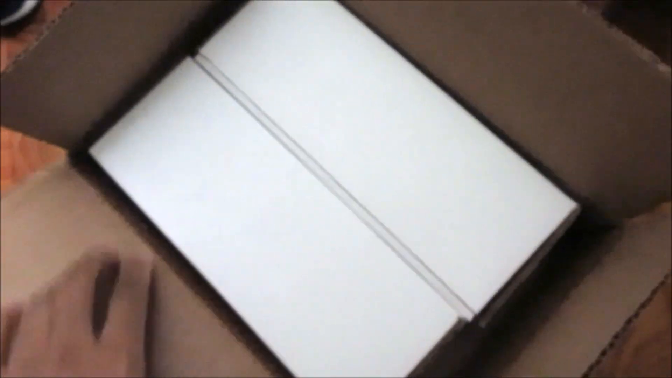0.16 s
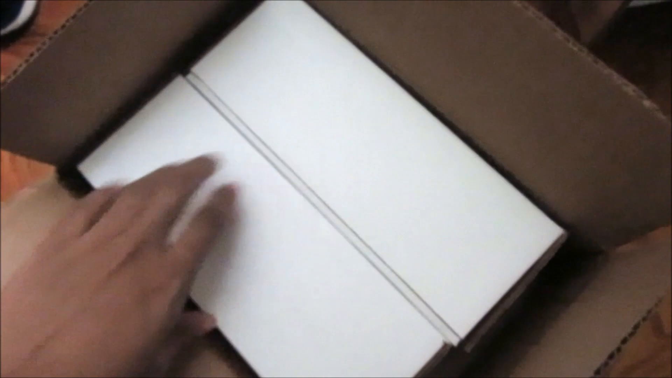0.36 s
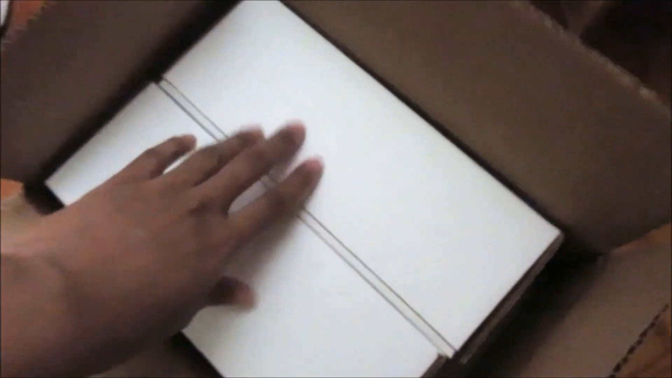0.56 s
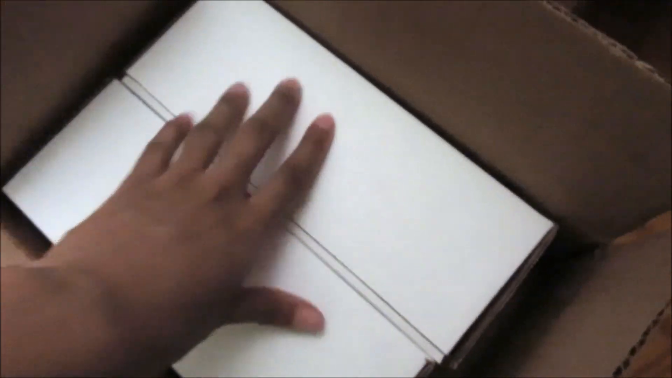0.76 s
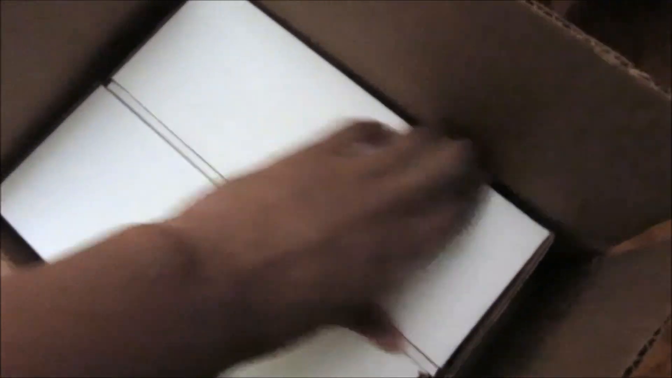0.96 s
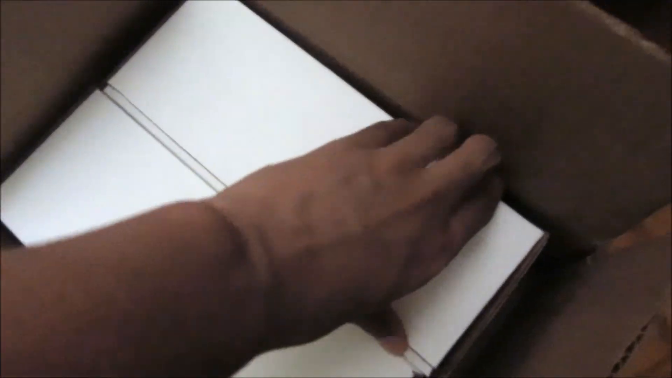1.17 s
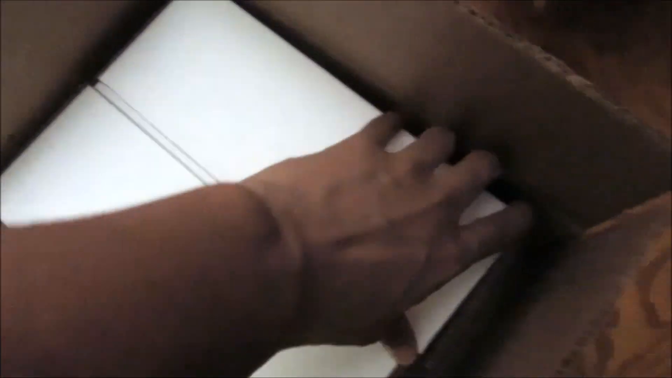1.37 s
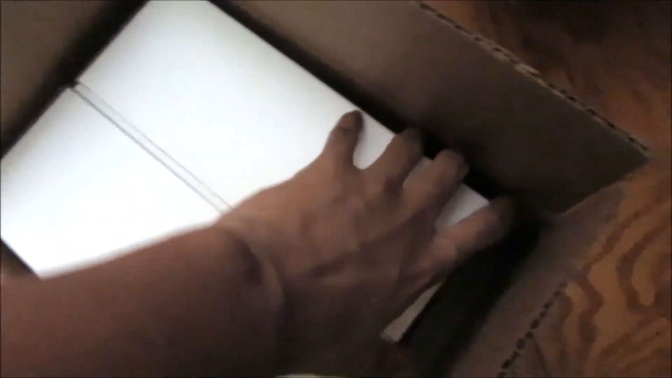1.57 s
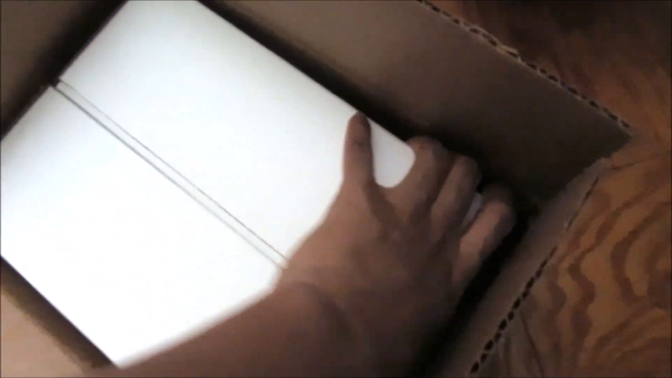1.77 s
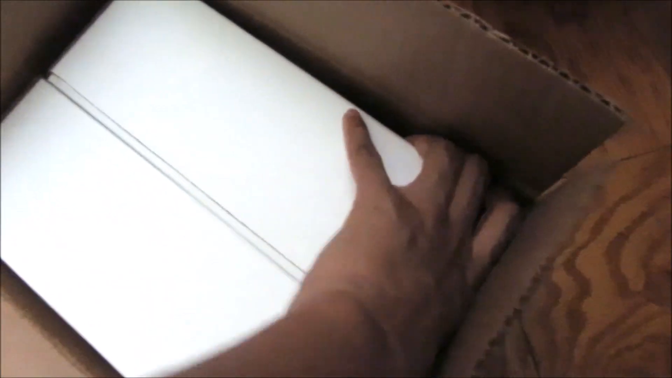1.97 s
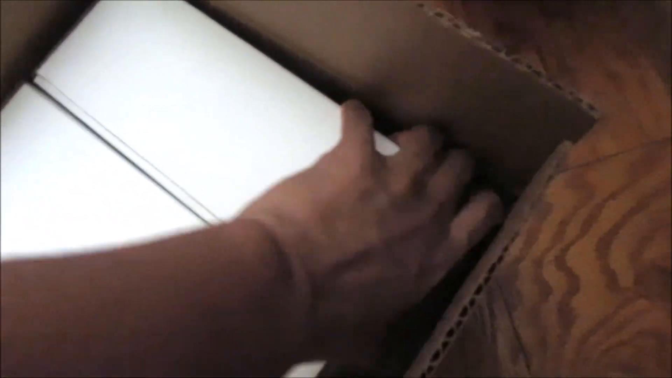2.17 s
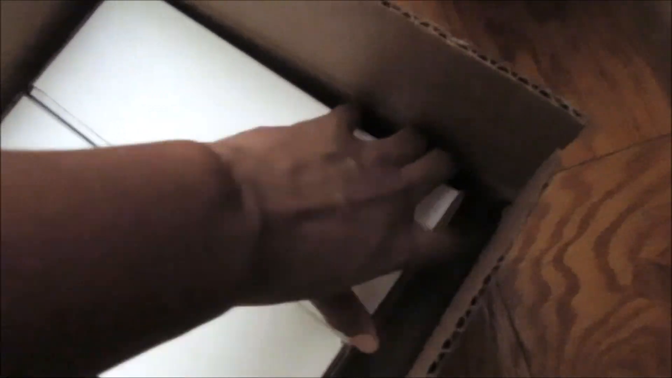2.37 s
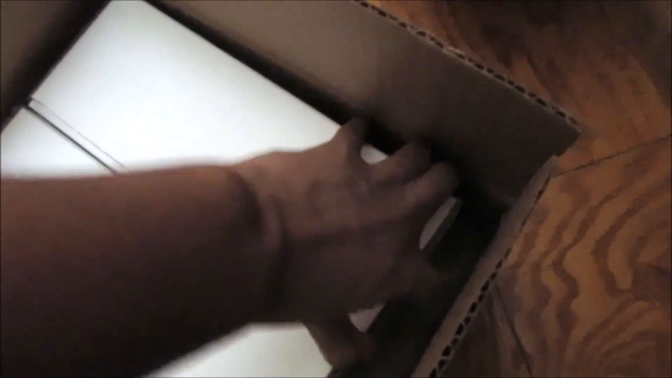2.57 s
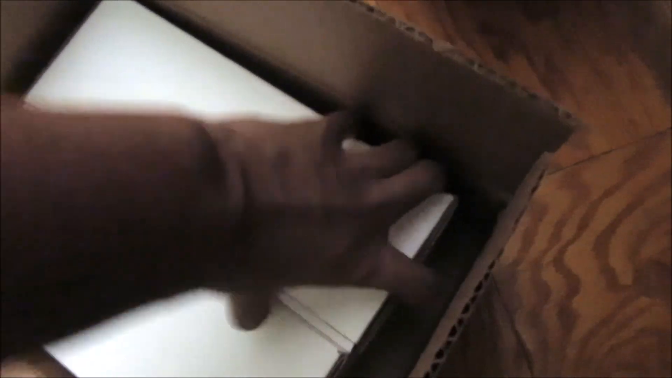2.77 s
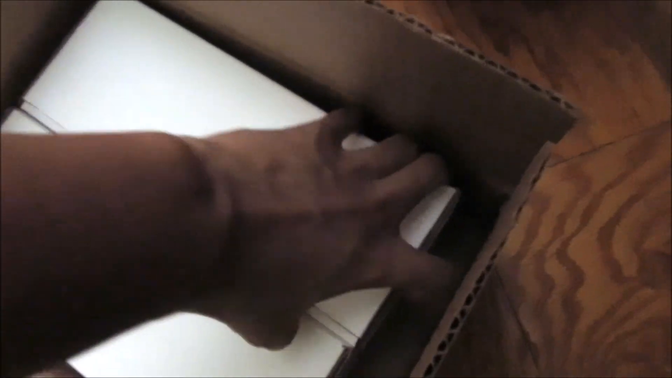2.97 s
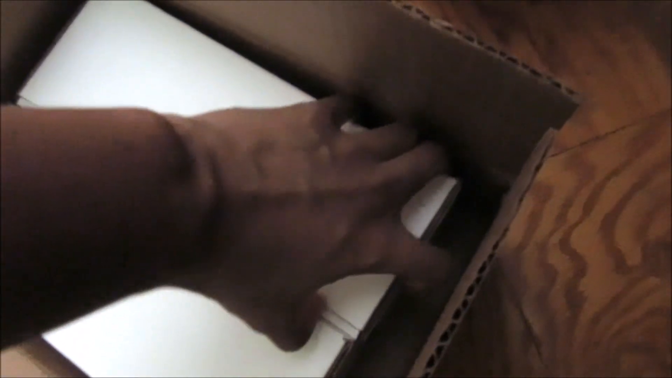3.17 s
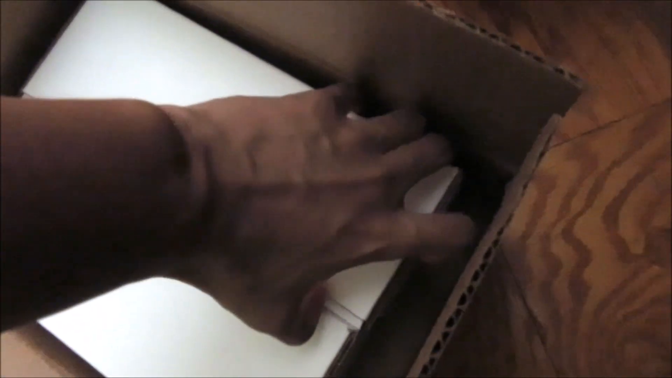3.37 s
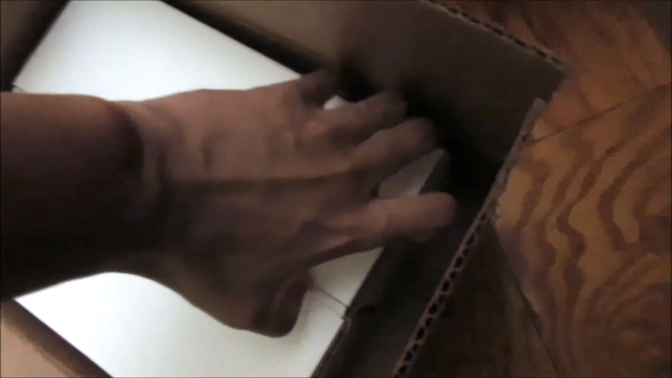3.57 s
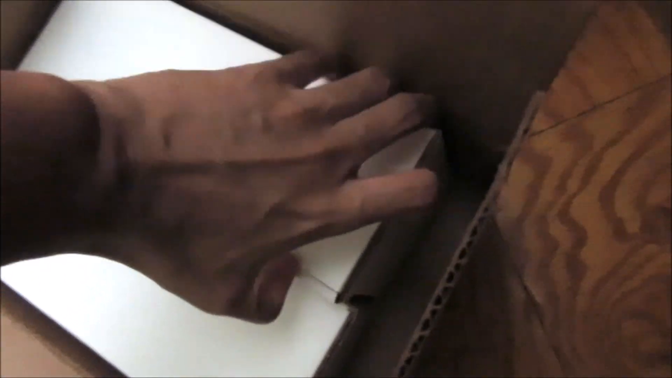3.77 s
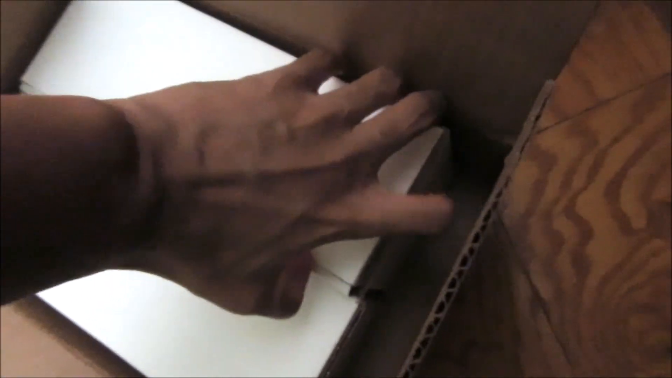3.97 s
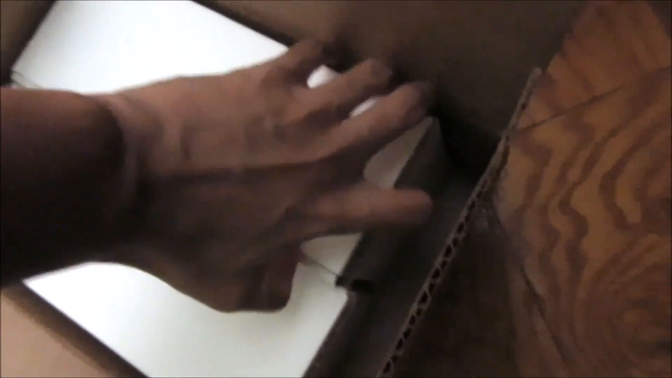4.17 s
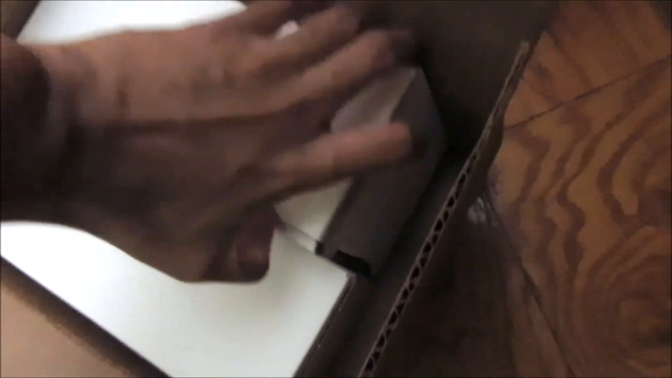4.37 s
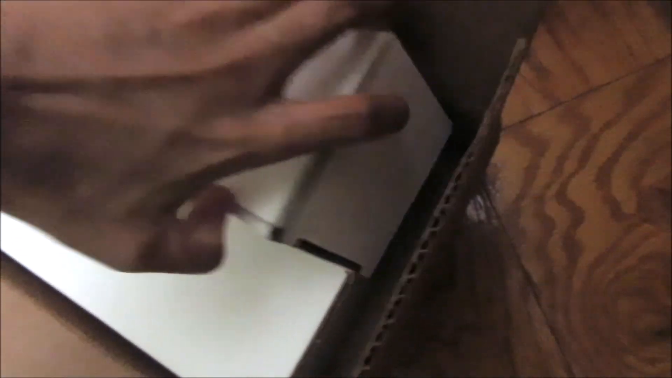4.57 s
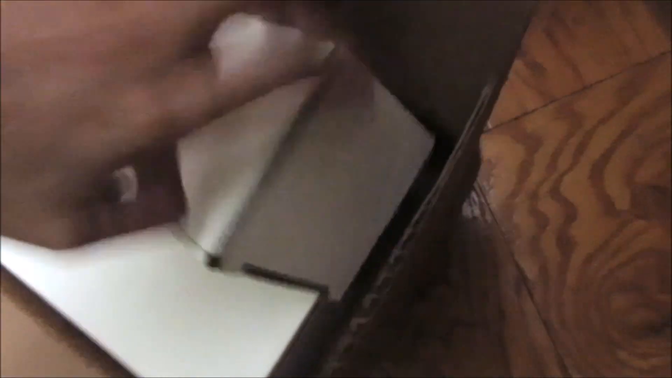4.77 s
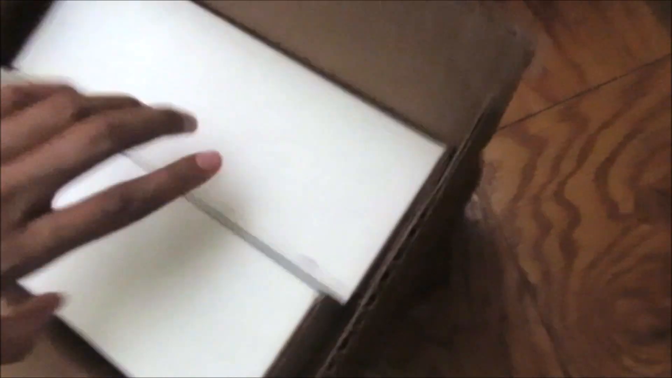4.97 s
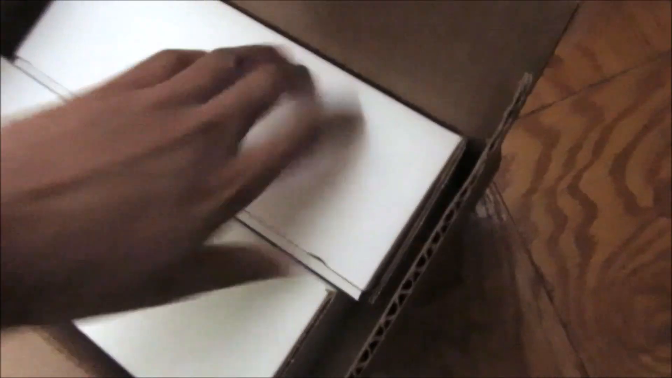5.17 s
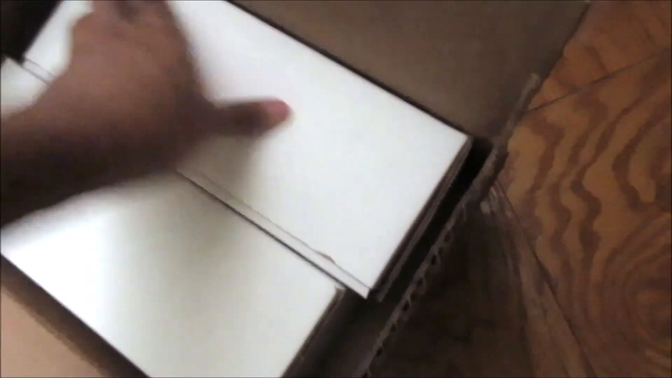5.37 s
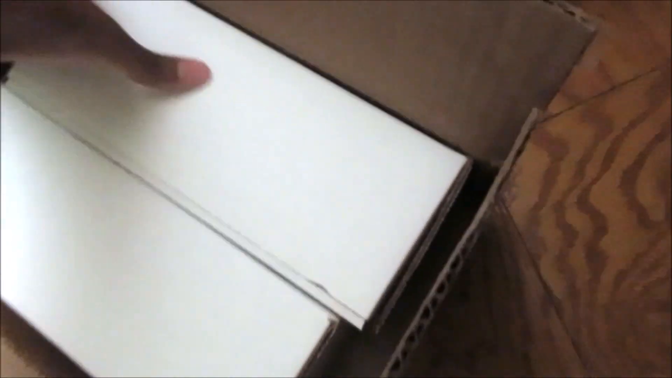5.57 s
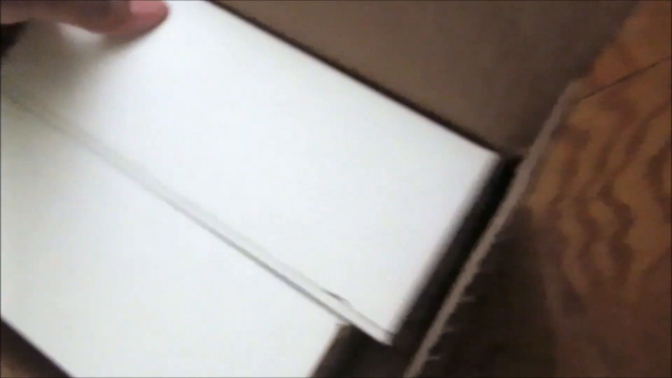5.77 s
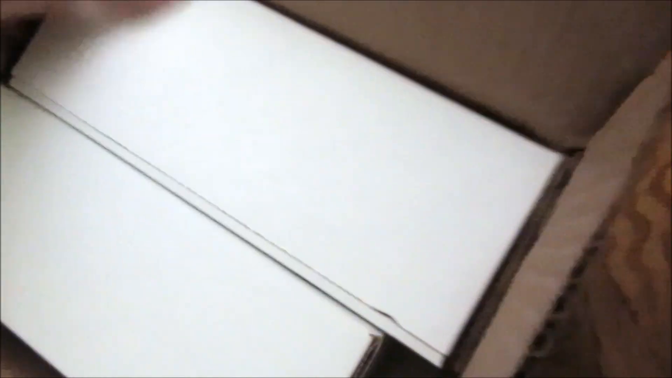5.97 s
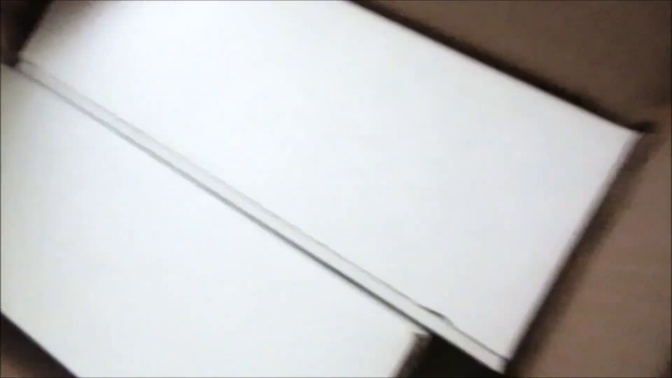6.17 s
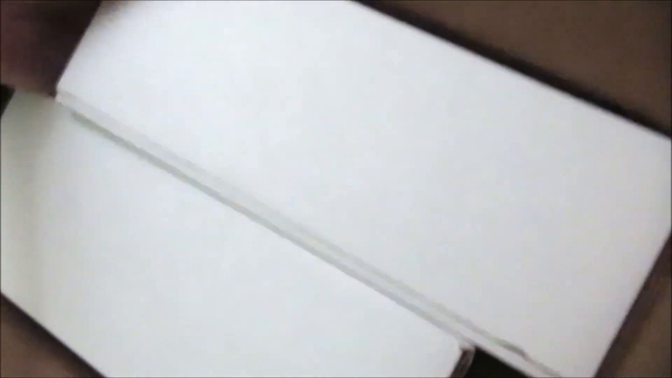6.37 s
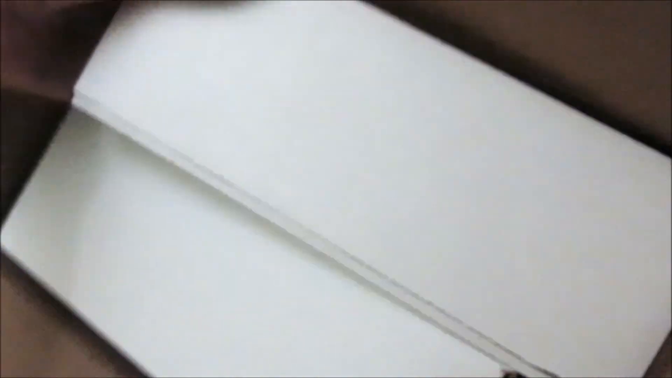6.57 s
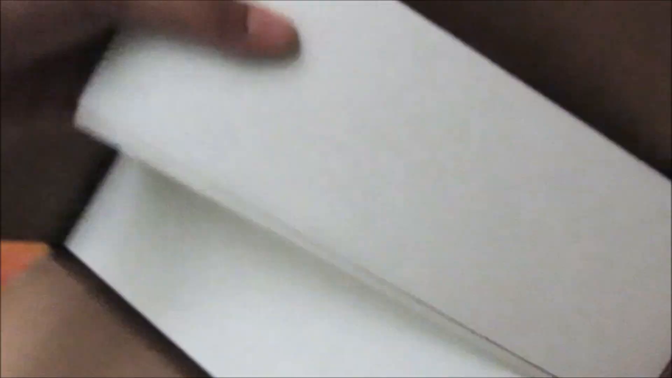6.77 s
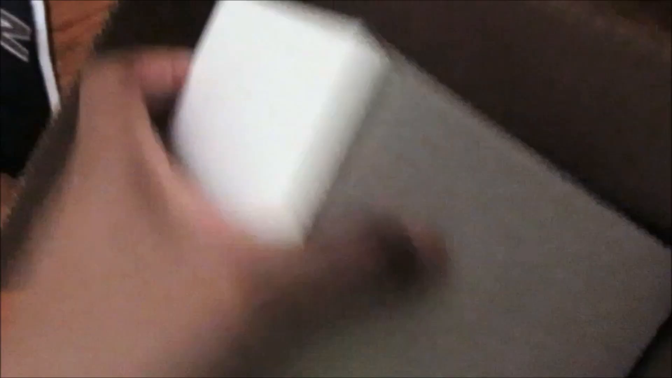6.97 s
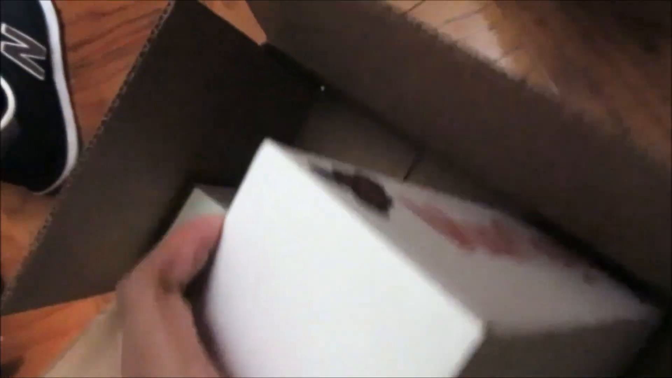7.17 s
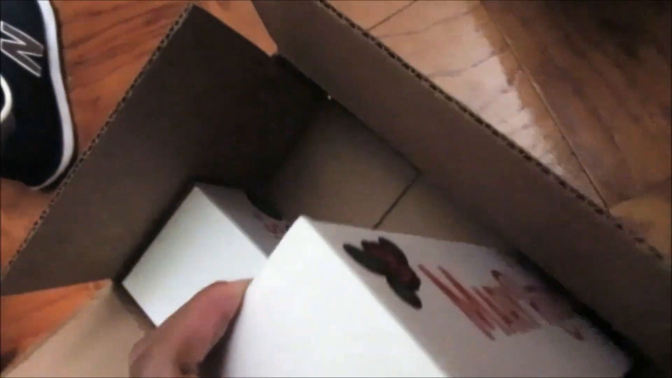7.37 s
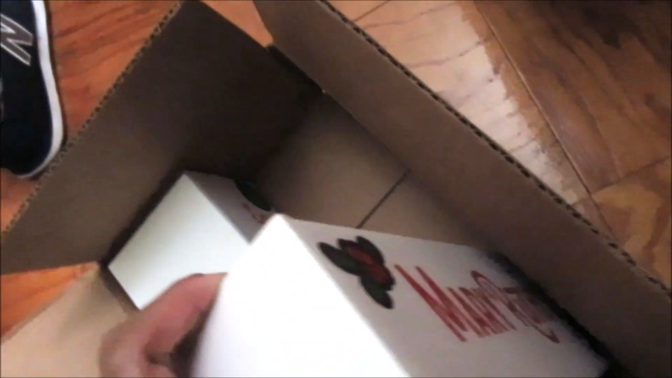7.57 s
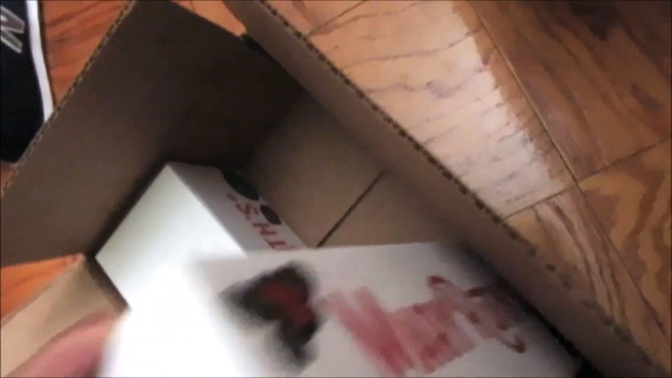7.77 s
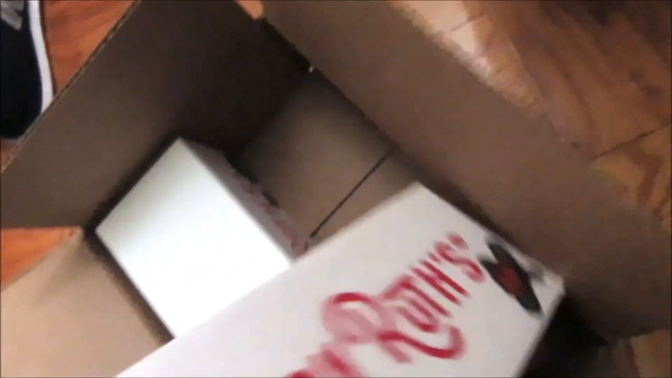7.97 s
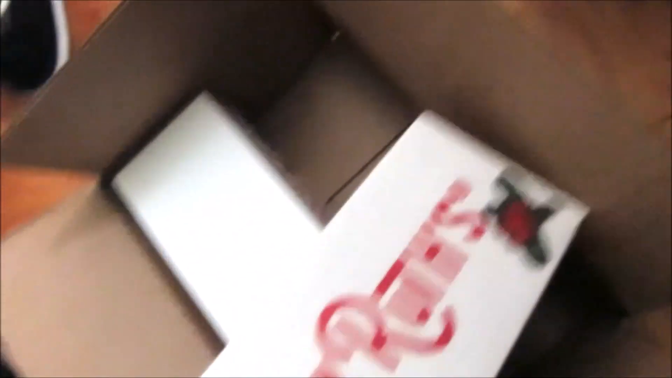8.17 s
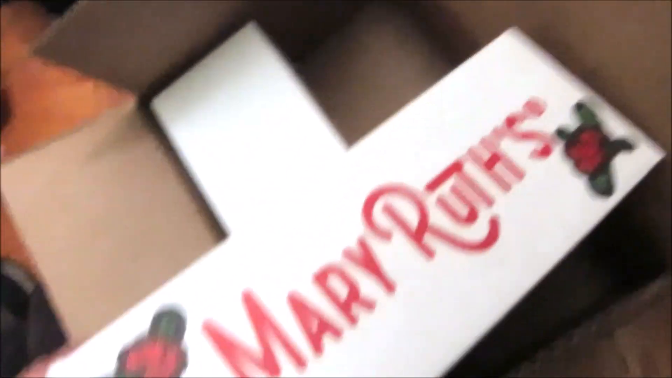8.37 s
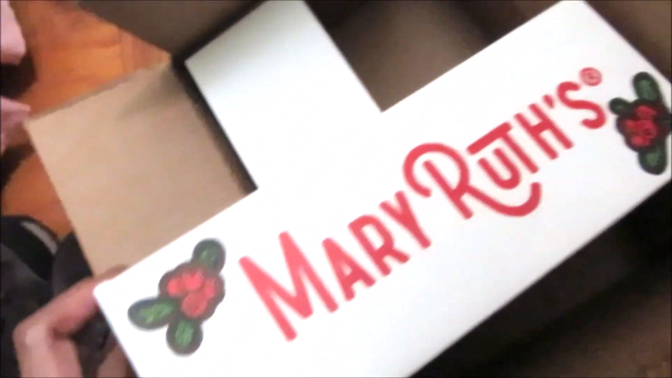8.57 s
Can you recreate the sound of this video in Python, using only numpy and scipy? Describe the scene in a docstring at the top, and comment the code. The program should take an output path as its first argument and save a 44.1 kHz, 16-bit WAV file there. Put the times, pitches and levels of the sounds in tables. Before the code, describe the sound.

Small cardboard boxes rub, knock and scrape as a hand pries one out of a carton, close up over a soft hum.

```python
"""A hand rubs, pries at, drops and pulls out small cardboard boxes packed in a carton.
Sliding card catches and lets go in many tiny slips, which hiss on the surface and make the hollow
boxes ring. Boxes knock together, their edges snap, and now and then a panel creaks.
Soft room noise and a mains hum lie underneath. It is all heard close up, in stereo."""
import sys
import numpy as np
from scipy import signal
from scipy.fft import rfft, irfft, next_fast_len
from scipy.io import wavfile
from scipy.ndimage import uniform_filter1d

SR = 44100
rng = np.random.default_rng(int(sys.argv[2]) if len(sys.argv) > 2 else 0)


def master(y):
    """Save y as 16-bit WAV."""
    cut = np.clip(np.atleast_2d(y).T, -1, 1)
    pcm = np.round(cut * 32767)  # scale
    wavfile.write(sys.argv[1], SR, pcm.astype(np.int16))


N = 379701

# the notes that carton and boxes ring with: (pitch [Hz], level [dB], time to fade by 60 dB [s])
CARD_NOTES = [(88.5, 1.5, 0.081), (141, -12.5, 0.2), (177, 0.5, 0.048), (256, 0.5, 0.07), (302, 4, 0.065),
              (343.6, 1, 0.049), (429.6, 2.5, 0.043), (499.3, 2.5, 0.069), (614, 3, 0.032), (706, 0, 0.067),
              (886, -1.5, 0.041), (1040, -5, 0.048), (1299, 9.5, 0.032), (1576, 11, 0.029),
              (1700, 12.5, 0.017), (1820, 8, 0.026), (2300, 4.5, 0.028), (2490, 7, 0.0076),
              (3870, 2, 0.014), (4400, 2, 0.011), (5100, 8, 0.0038)]
# the tone of card dragging on card: (frequency [Hz], relative level [dB])
DRAG_TONE = [(440, -16), (750, -2), (1130, 0.5), (2300, -3.5), (3190, -8), (3920, -12), (7000, -23.5),
             (9100, -31), (15400, -120)]
# the tone of fingertips on card: (frequency [Hz], relative level [dB])
HISS_TONE = [(3240, -8), (5500, -5.5), (7830, -6.5), (10100, -6), (13300, -7), (14900, -9.5), (15500, -22),
             (15900, -32)]
# how much the whole carton sways: (time [s], level compared with the box tone [dB])
CARTON_SWAY = [(0, -19), (0.75, -28), (1.4, -4), (2.6, -12), (4.1, -1.5), (4.27, -29), (4.78, -9),
               (5.1, -0.5), (5.3, -23), (5.57, 7.5), (6.0, -10), (6.6, -4), (6.79, -41), (7.12, -17),
               (7.9, -9), (8.22, -1), (8.61, -12)]


def rubbing():
    """Tiny slips shake the card surface, the hollow boxes and the whole carton."""
    t = np.arange(N) / SR
    steps = t[::128]
    drag_db, hiss_db, box_db = (np.interp(t, steps, db) for db in hand_moves(steps))
    sway_db = at_time(CARTON_SWAY, t)[0]
    fine = slips(per_s=6000, spread_db=1.6, rustle=1.3)
    coarse = slips(per_s=600, spread_db=2.5, rustle=1.5)
    drag = shape(fine, lambda hz: amp(at_hz(DRAG_TONE, hz)) * (1 + .1 * peaks(hz, CARD_NOTES[10:], .2)))
    hiss = shape(fine, lambda hz: amp(at_hz(HISS_TONE, hz)))
    hollow = shape(coarse, lambda hz: peaks(hz, CARD_NOTES[2:12], 2.93) * amp(-5 * above(hz, 330)))
    sway = shape(coarse[::-1], lambda hz: peaks(hz, CARD_NOTES[:2], 4) + .5 * bump(hz, 55, 20))
    jerk_db = drag_db - uniform_filter1d(drag_db, SR // 4)  # quick changes of drag shake the boxes too
    judder_db = 0.066 * np.maximum(drag_db + 67, 0) * wobble(150)  # hard drag catches and lets go
    surface = unit(drag) * amp(drag_db + judder_db) + unit(hiss) * amp(hiss_db)
    body = (unit(hollow) + unit(sway) * amp(sway_db)) * amp(box_db + 0.13 * jerk_db)
    # the tone flickers as the touching spots wander
    return flicker(surface + body, depth_db=2.2, bands=2, frames=14, lift=sliding)


# strokes over card: (full at [s], swell [s], hold [s], fade [s], drag [dB], hiss [dB], box tone [dB])
HAND_STROKES = [(0.005, 0.059, 0.0078, 0.3, -64, -63.5, -56), (0.202, .08, 0.012, 0.15, -69, -56.5, -56),
                (0.599, 0.008, 0.12, 0.44, -80, -59, -54.5), (1.022, 0.75, 0.051, 0.18, -57.5, -51, -52),
                (1.265, 0.11, 0.14, 0.21, -57, -54, -50.5), (1.561, 0.19, .003, 0.039, -56, -52.5, -47.5),
                (1.796, 0.45, 0.057, 0.19, -57.5, -58, -50), (1.977, 0.29, .003, 0.52, -57.5, -61, -51),
                (2.217, 0.28, .003, 0.2, -50.5, -57.5, -48.5), (2.328, 0.26, .003, 0.24, -59.5, -57, -44.5),
                (2.468, 0.2, .003, 0.28, -61.5, -60, -57), (2.703, 0.32, .003, 0.31, -56.5, -53.5, -46.5),
                (2.835, 0.16, 0.039, 0.14, -59.5, -59.5, -50.5), (3.025, 0.13, .003, 0.13, -57, -58, -48.5),
                (3.135, 0.073, 0.066, 0.088, -60.5, -63, -54), (3.315, 0.41, 0.018, 0.31, -64.5, -63, -55),
                (3.504, 0.19, 0.078, 0.65, -58.5, -64, -57.5), (3.846, 0.7, .003, 0.19, -58, -56.5, -49.5),
                (3.96, 0.25, .003, 0.24, -55.5, -60, -52.5), (4.047, .005, 0.0083, 0.26, -74, -58, -64),
                (4.263, 0.13, 0.12, 0.25, -57, -59.5, -51), (4.474, 0.35, 0.26, 0.51, -49, -57, -46.5),
                (4.826, 0.0077, .003, 0.17, -41, -47.5, -35), (4.9, 0.026, 0.042, 0.2, -42, -46, -47),
                (4.97, 0.012, 0.0025, 0.033, -24, -38, -29.5), (5.062, 0.13, 0.018, 0.09, -52, -86, -35.5),
                (5.298, 0.057, 0.064, 0.011, -59, -50, -44), (5.394, 0.05, 0.15, 0.11, -71, -53, -76),
                (5.56, 0.12, .003, 0.15, -42.5, -43, -50), (5.665, 0.17, 0.08, 0.28, -63.5, -53.5, -74),
                (5.841, 0.13, 0.057, 0.22, -50.5, -49, -56), (6.025, 0.94, 0.033, 1, -56.5, -55.5, -45.5),
                (6.363, 0.26, 0.044, 0.23, -48, -50, -44), (6.545, 0.13, 0.024, 0.15, -54, -48, -52),
                (7.267, 0.026, 0.089, 0.36, -50, -53, -50), (8.197, 0.11, .003, 0.27, -45, -47, -43),
                (8.284, 0.25, .003, 0.2, -45.5, -50, -51.5), (8.418, 0.13, 0.026, 0.44, -49.5, -56.5, -47)]
# a box is drawn out, then set down; one list per move: (time [s], drag [dB], hiss [dB], box tone [dB])
BOX_PULLS = [
    [(6.45, -56, -82, -42), (6.6, -46, -49.5, -44.5), (6.7, -40, -44.5, -35), (6.787, -38, -45.5, -33),
     (6.85, -32.5, -37, -32.5), (6.927, -38, -29.5, -43), (6.965, -32.5, -34, -39), (7.115, -50, -56, -49),
     (7.24, -52, -66, -50), (7.35, -81, -90, -74)],
    [(7.6, -81, -92, -68), (7.665, -66, -76, -60), (7.72, -53.5, -73, -54), (7.875, -45.5, -48, -51.5),
     (7.94, -42, -44.5, -43.5), (8.01, -49.5, -45, -46.5), (8.085, -54.5, -54, -45),
     (8.15, -51, -54.5, -51), (8.25, -85, -85, -61)],
]
# the hand at rest: (drag [dB], hiss [dB], box tone [dB])
RESTING_HAND = [-69, -84, -62]


def hand_moves(t):
    """Levels of drag, hiss and box tone in dB: strokes and pulls add to the resting hand."""
    swing_db = 28 * np.c_[[1, 1.55, 0.78]]  # how far each of the three rises in a swell, falls in a fade
    power = amp(RESTING_HAND)[:, None] ** 2 * np.ones(len(t))
    for full_at, swell, hold, fade, *level_db in HAND_STROKES:
        early = np.maximum((full_at - t) / swell, 0)
        late = np.maximum((t - full_at - hold) / fade, 0)
        power += amp(np.c_[level_db] - swing_db * (early + late)) ** 2
    for pull in BOX_PULLS:
        power += amp(at_time(pull, t)) ** 2 * (t > pull[0][0]) * (t < pull[-1][0])
    return 10 * np.log10(power)


def slips(per_s, spread_db, rustle):
    """Paper fibres stick and slip: uneven clicks over a smooth rustle, in two unrelated rows."""
    size = amp(spread_db * np.minimum(rng.exponential(1, (2, N)), 4))
    size *= rng.random((2, N)) < per_s / SR
    return unit(size * rng.standard_normal((2, N))) + rustle * rng.standard_normal((2, N))


# a slide sings, higher when faster: (start [s], end [s], first pitch [kHz], last pitch [kHz], boost [dB])
SINGING_SLIDES = [(0.56, 1.08, 23, 12, 10.5), (5.354, 5.516, 2.5, 3.5, 9.5), (5.364, 5.63, 19, 14, 6),
                  (5.933, 6.357, 3.1, 4.9, 7.5), (6.684, 7.026, 4.1, 6.7, 9.5)]
# card rings against card or palm: (start [s], end [s], boost [dB], pitch rise [fraction], pitches [Hz])
TOUCHING_FACES = [(4.4, 4.82, 8, 0.02, [520, 643, 1245, 1425, 1600]),
                  (4.41, 4.64, 10, 0.05, [3820, 4900, 5400]), (6.62, 6.95, 9, 0.04, [494, 627, 1020]),
                  (6.68, 6.86, 7.5, 0.08, [1870, 3060, 3370]),
                  (6.785, 6.953, 10.5, -0.00087, [2170, 2260, 2730]), (0.19, 0.26, 11, 0.01, [1630, 2650]),
                  (6.3, 6.426, 9, 0.028, [1150, 2820]), (7.08, 7.56, 8.5, -0.03, [1380]),
                  (7.26, 7.45, 10, -0.027, [2820, 3330, 3750]),
                  (0.71, 1.01, 8, 0.13, [2100, 3100, 3900, 5800])]


def sliding(hz, t):
    """Sliding faces make some pitches stand out; gives the boost in dB by frequency and time."""
    boost = np.zeros((len(hz), len(t)))
    hz = hz[:, None]
    for start, end, first, last, db in SINGING_SLIDES:
        progress = np.clip((t - start) / (end - start), 0, 1)
        centre_hz = 1000 * (first + (last - first) * progress)
        boost += db * np.sin(np.pi * progress) * np.exp(-(apart(hz + 1, centre_hz) / 0.69) ** 2)
    for start, end, db, rise, pitches in TOUCHING_FACES:
        on = (t > start) & (t < end)
        progress = (t[on] - start) / (end - start)
        touch = np.minimum(np.minimum(progress, 1 - progress) / 0.14, 1)
        bend = 1 + rise * (progress - .5)
        bands = sum(np.exp(-((hz - f * bend) / (2.46 * np.sqrt(f))) ** 2) for f in pitches)
        boost[:, on] += db * touch * bands
    return boost


# boxes bump: (time [s], level [dB], panel pitch [Hz], thump [dB], rap [dB], rap pitch [Hz], crack [dB],
# ring length [factor]); thump, rap and crack are compared with the level
BOX_KNOCKS = [(1.014, -28, 537, -22, -5.5, 1060, -14, 2.7), (1.055, -32, 580, -5, -2, 900, -9, 1.1),
              (1.357, -37, 388, -10, -9, 694, -4, 8.1), (1.843, -34.5, 281, -11, -2.5, 600, -22, 1.3),
              (1.985, -35, 315, -43, -5, 606, -26, 0.86), (2.202, -35, 316, -21, -13, 781, -7, 2.7),
              (2.311, -38.5, 565, -5, 5, 650, -22, 0.65), (2.529, -31, 283, -17.5, -5.5, 693, -23.5, 1.3),
              (2.688, -29, 520, -9, 8.5, 1530, -6, 0.6), (3.028, -31.5, 302, -21, -9.5, 638, -14, 1.3),
              (3.101, -27, 333, -13, -1.5, 666, -21, 1.3), (3.536, -37, 253, -18, -10, 624, -13, 1.1),
              (3.952, -33.5, 307, -22, -24, 614, -14, 0.5), (4.051, -37.5, 496, -2, -6, 650, -19, 1.5),
              (4.826, -11, 254, -15, 2.5, 900, -8.5, 1.05), (4.837, -14.5, 263, -3, -12, 686, -41, 0.89),
              (4.971, -2.5, 198, -33, -3.5, 604, -22, 1.17), (5.054, -27.5, 221, -8, 3, 610, -33, 1.5),
              (5.066, -21.5, 153, -11, -7, 813, -31, 0.91), (5.287, -21.5, 350, -10, -4.5, 606, -13, 0.78),
              (5.549, -18, 274, -13, -12, 2270, -14, 2.5), (5.574, -32, 283, -30, 4.5, 1260, -10, 1.1),
              (5.642, -33.5, 275, -13, -34, 655, -23, 0.71), (5.697, -25.5, 166, -26.5, -36, 681, -28, 1.9),
              (5.817, -20.5, 158, -16, -35.5, 2450, -22, 0.5), (5.949, -31.5, 151, 1, -18, 697, -28, 0.64),
              (6.065, -19.5, 466, -4.5, -1.5, 674, -12.5, 0.81), (6.206, -32.5, 151, 1, -2, 651, -18, 0.94),
              (6.312, -35, 185, -19, 5, 644, -7, 0.34), (6.411, -22, 152, -4, -6, 626, -15, 1.5),
              (6.559, -30.5, 151, 6, -19, 700, -21, 0.62), (6.638, -21, 277, -17, -11, 684, -16, 3),
              (8.016, -21.5, 256, -14, -15, 762, -15, 1.6), (8.187, -22, 247, 0, -5, 1030, -16, 0.19)]


def knock(db, panel_hz, thump_db, rap_db, rap_hz, crack_db, ring):
    """A push and a fading chatter ring the card; notes near the struck panel and edge are loudest."""
    t = np.arange(6000) / SR
    hz, note_db, fade_s = np.transpose(CARD_NOTES)[:, :, None]
    chatter_noise, crack_noise = rng.standard_normal((2, len(t)))
    detune = rng.uniform(-0.02, 0.01, hz.shape)
    side = (-1) ** (np.arange(len(hz))[:, None] // 2)  # neighbouring panels move against each other
    fade_s = fade_s * np.where(hz < 900, ring, 1)
    notes = side * amp(note_db - 60 * t / fade_s) * np.sin(2 * np.pi * hz * (1 + detune) * t)
    panel = (notes * amp(-12.7 * apart(hz, panel_hz)))[2:9]
    rap = (notes * amp(-8.3 * apart(hz, rap_hz)))[8:]
    chatter = .2 * chatter_noise * np.exp(-t / (.007 * ring))
    crack = crack_noise * (np.exp(-t / 0.0054) + 0.033 * amp(-60 * t / 0.067))
    crack = shape(crack, lambda f: amp(-6 * apart(f + 1, 4200) - 6.5 * above(f, 7000)))
    blow = peak_at(crack_db, crack)
    for part_db, part, pitch in ((0, panel, panel_hz), (thump_db, notes[:2], 150), (rap_db, rap, rap_hz)):
        push = np.exp(-(t * pitch / .14 - 2) ** 2) + chatter  # big panels take a longer push
        blow += peak_at(part_db, signal.fftconvolve(part.sum(0), push[:1500])[:len(t)])
    bass_cut = signal.butter(3, 62, "high", fs=SR, output="sos")  # small boxes give off no deep bass
    return -amp(db) * signal.sosfilt(bass_cut, blow)


# card edges snap and scuff: (time [s], level [dB], pitch [Hz], length [ms], relative brightness [dB])
EDGE_SNAPS = [(0.6, -52, 3620, 9, -17), (2.688, -21.5, 1470, 2, -11), (2.808, -36, 1570, 4.6, -10),
              (2.9246, -40, 2350, 3.3, -16), (2.9653, -38, 1360, 7.8, -26),
              (3.7605, -32.5, 8450, 2.8, -3.5), (3.8818, -36.5, 1210, 3.2, -17),
              (3.9095, -39, 5170, 1.2, -20), (4.898, -26.5, 2000, 17, -21),
              (5.0512, -29, 1900, 10.3, -23.5), (5.138, -38, 1470, 3.2, -37), (5.257, -47, 1610, 19, -12),
              (5.36, -33.5, 1600, 5.9, -12), (5.5217, -26.5, 2350, 8.7, -9.5), (5.547, -27, 2600, 1.3, -17),
              (5.6123, -31.5, 2800, 3, -18), (5.6127, -33, 11500, 2, -20), (6.1077, -27, 2800, 10, -24),
              (6.433, -25.5, 1780, 15.4, -15), (6.8055, -18, 2600, 1.1, -19),
              (7.709, -47.5, 8000, 1.8, -12), (7.768, -36, 2190, 3.7, -24), (7.9086, -43, 1290, 8.3, -17)]


def snap(db, hz, length_ms, bright_db):
    """A card edge gives a gritty burst; longer scuffs start softer, hold and stop short."""
    ms = np.arange(3000) / SR * 1000
    attack = 1 - np.exp(-ms / (0.0093 * length_ms ** 2 + 0.025))
    decay = np.exp(-(ms / length_ms) ** (1 + 0.092 * length_ms))
    burst = rng.standard_normal(len(ms)) * attack * decay
    treble_db = lambda f: bright_db - 5.8 * apart(f + 1, 6000) - 3 * above(f, 7000)
    return peak_at(db, shape(burst, lambda f: amp(np.maximum(-18 * apart(f + 1, hz), treble_db(f)))))


# panels creak: (time [s], level [dB], pitch [Hz], length [ms], width to each side [Hz])
PANEL_CREAKS = [(5.136, -53, 1710, 36, 58.5), (6.322, -37, 630, 103, 130), (6.492, -42, 630, 44, 90),
                (6.522, -33, 644, 31.5, 70.5), (7.967, -36, 282, 48, 50)]


def creak(db, hz, length_ms, width_hz):
    """A slipping edge keeps one panel singing on a rough note."""
    rough = rng.standard_normal(6000)[:int(length_ms / 1000 * SR)]
    tone = shape(rough, lambda f: bump(f, hz, width_hz))
    return amp(db) * unit(tone) * signal.windows.tukey(len(tone), .5)


def short_sounds():
    """Knocks, snaps and creaks in two rows: direct with room echo, and scattered by the carton walls."""
    track = np.zeros(N + 6000)
    for make, table in ((knock, BOX_KNOCKS), (snap, EDGE_SNAPS), (creak, PANEL_CREAKS)):
        for start, *settings in table:
            sound = make(*settings)
            fade_out = np.minimum(np.arange(len(sound))[::-1] / 300, 1) ** 2
            track[round(start * SR):][:len(sound)] += sound * fade_out
    return np.array([track[:N] + amp(-10.5) * echoes(track, fade_s=0.18), echoes(track, fade_s=0.0022)])


def echoes(x, fade_s):
    """Reflections blur into a noisy tail that drops 60 dB in fade_s."""
    t = np.arange(SR // 3) / SR
    tail = rng.standard_normal(len(t)) * amp(-60 * t / fade_s) * (t > .002)
    return signal.fftconvolve(x, tail / np.linalg.norm(tail))[:N]


# the tone of the room noise: (frequency [Hz], relative level [dB])
ROOM_TONE = [(12, -54), (20, -22), (64, -11), (95, -11), (122, -17), (171, -9), (342, -19.5), (549, -29.5),
             (788, -31), (881, -30), (1410, -35.5), (13100, -54.5), (15500, -61)]
# how alike the room is on the left and right: (frequency [Hz], likeness [-1 to 1])
ROOM_LIKENESS = [(60, 1.0), (240, 0.99), (950, -0.58), (3770, -0.62), (15000, 0.82)]


def room_noise(level_db=-54):
    """A soft, low rush whose tone drifts a little."""
    air = shape(rng.standard_normal((2, N)), lambda hz: amp(at_hz(ROOM_TONE, hz)))
    air = flicker(air, depth_db=1.3, bands=5, frames=60)
    return microphones(*amp(level_db) * unit(air), ROOM_LIKENESS, near=0)


# the hum of an appliance: (pitch [Hz], average level [dB])
HUM_NOTES = [(119.9, -47.5)]


def mains_hum():
    """Mains power makes an appliance hum; the level wavers slightly."""
    t = np.arange(N) / SR
    waver_db = 0.21 * wobble(6000)
    return sum(amp(db + waver_db) * np.sqrt(2) * np.sin(2 * np.pi * hz * t) for hz, db in HUM_NOTES)


# how far a near sound is ahead on the left: (frequency [Hz], lead [radians])
LEFT_LEAD = [(100, 0), (3000, -.08), (4200, -.5), (6500, -1.3), (11000, -1.5), (15500, -2.6)]
# how much louder a near sound is on the left: (frequency [Hz], left minus right [dB])
LEFT_LOUDER = [(150, 0), (400, -.6), (1200, -1.6), (2400, -.9), (4400, -1.8), (8000, -.5), (15000, 0)]


def microphones(left, unrelated, likeness, near):
    """The right microphone hears the left one's sound, shifted, plus a share of an unrelated one."""
    like = lambda hz: at_hz(likeness, hz)
    shift = lambda hz: np.exp(-1j * near * at_hz(LEFT_LEAD, hz)) * amp(-near * at_hz(LEFT_LOUDER, hz))
    shared = shape(left, lambda hz: like(hz) * shift(hz))
    separate = shape(unrelated, lambda hz: np.sqrt(1 - like(hz) ** 2) * shift(hz))
    return np.array([left, shared + separate])


def flicker(x, depth_db, bands, frames, lift=lambda hz, t: 0):
    """Random patches of the tone, bands wide and frames long, swell and fade; lift adds a boost in dB."""
    hz, t, spectrum = signal.stft(x, SR, nperseg=512, noverlap=384)
    patches = uniform_filter1d(rng.standard_normal(spectrum.shape[1:]), bands, 0)
    patches = unit(uniform_filter1d(patches, frames, 1))
    spectrum = spectrum * amp(depth_db * patches + lift(hz, t))
    return signal.istft(spectrum, nperseg=512, noverlap=384)[1][:, :N]


def wobble(samples):
    """A random curve, smoothed over this many samples."""
    return unit(uniform_filter1d(uniform_filter1d(rng.standard_normal(N), samples), samples))


def shape(x, gain):
    """Turns each frequency up or down by gain(hz)."""
    size = next_fast_len(x.shape[-1])
    return irfft(rfft(x, size) * gain(np.fft.rfftfreq(size, 1 / SR)), size)[..., :x.shape[-1]]


def peaks(hz, notes, blur):
    """Gain with a peak at each ringing note; blur widens the peaks."""
    pitch, db, fade_s = np.transpose(notes)[:, :, None]
    return np.linalg.norm(amp(db) * bump(hz, pitch, blur * 1.18 / fade_s), axis=0)


def bump(hz, centre, width):
    """Gain of 1 at the centre, halved one width away."""
    return 1 / (1 + ((hz - centre) / width) ** 2)


def apart(hz, centre):
    """Octaves between two pitches."""
    return abs(np.log2(hz / centre))


def above(hz, corner):
    """Octaves above the corner, 0 below it."""
    return np.log2(np.maximum(hz / corner, 1))


def at_hz(table, hz):
    """Reads a table between its rows, on a pitch scale."""
    f, value = np.transpose(table)
    return np.interp(np.log(hz + 1), np.log(f + 1), value)


def at_time(table, t):
    """Reads each column of a table at times t."""
    times, *columns = np.transpose(table)
    return [np.interp(t, times, column) for column in columns]


def amp(db):
    """Decibels to gain."""
    return 10 ** (np.asarray(db) / 20)


def unit(x):
    """Scales to an average size (rms) of 1."""
    return x / np.sqrt(np.mean(abs(x) ** 2) + 1e-20)


def peak_at(db, x):
    """Scales the highest peak to db."""
    return amp(db) * x / abs(x).max()


# how alike the boxes are on the left and right: (frequency [Hz], likeness [-1 to 1])
BOX_LIKENESS = [(100, 1), (300, .995), (640, .98), (1400, .955), (3100, .9), (7000, .7), (15000, .55)]


def scene():
    """Boxes handled close to the microphones, over room noise and hum."""
    boxes = rubbing() + short_sounds()
    return microphones(*boxes, BOX_LIKENESS, near=1) + room_noise() + mains_hum()


def record(dry):
    """Rounds off peaks above 0.6, then cuts the highest treble."""
    rounded = np.sign(dry) * (.6 + .3 * np.tanh((abs(dry) - .6) / .3))
    limited = np.where(abs(dry) < .6, dry, rounded)
    treble_cut = signal.firwin(511, 15900, window=("kaiser", 9), fs=SR)
    return signal.oaconvolve(limited, treble_cut[None], "same")


dry = scene()
out = record(dry)
master(out)
```